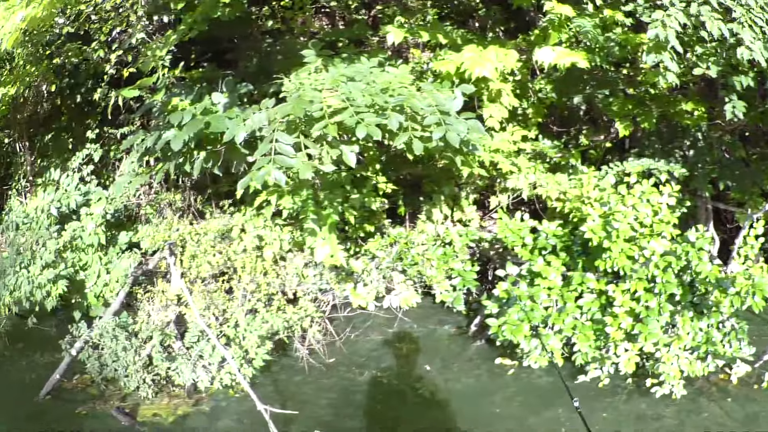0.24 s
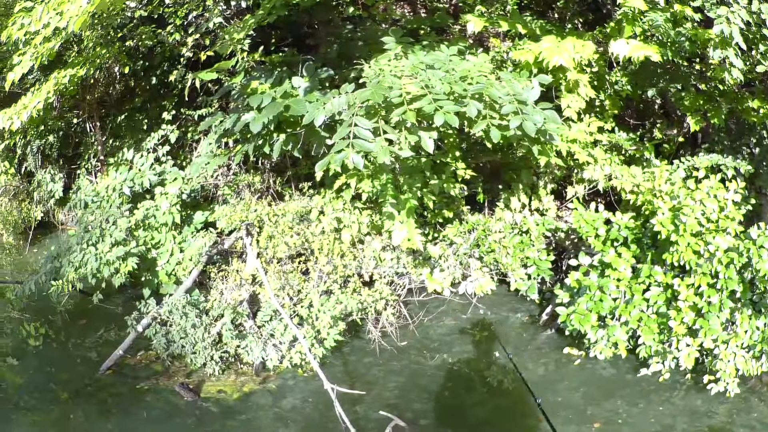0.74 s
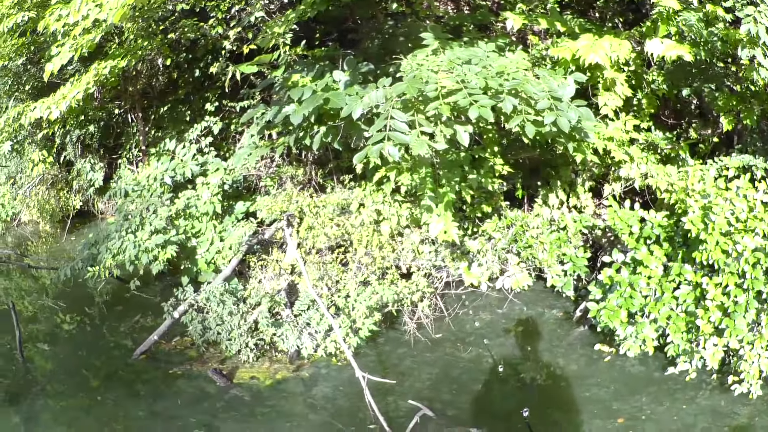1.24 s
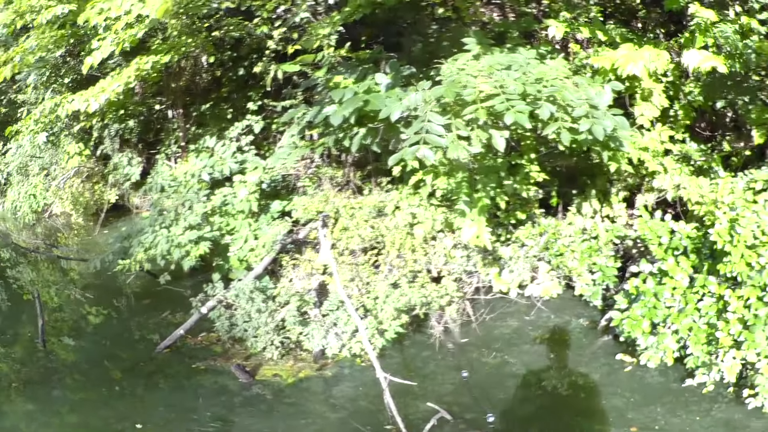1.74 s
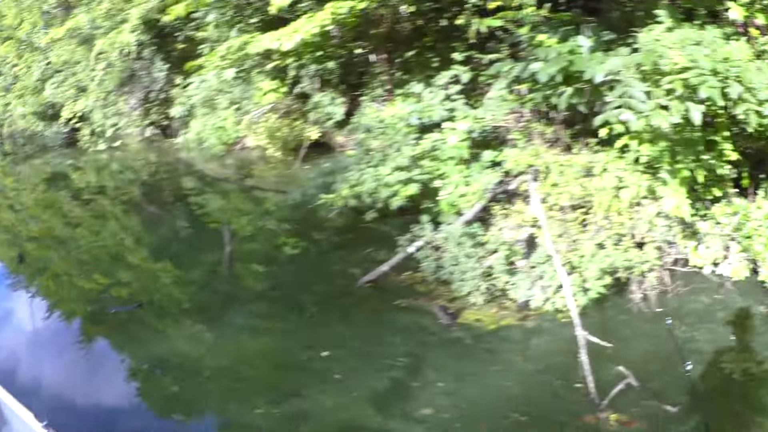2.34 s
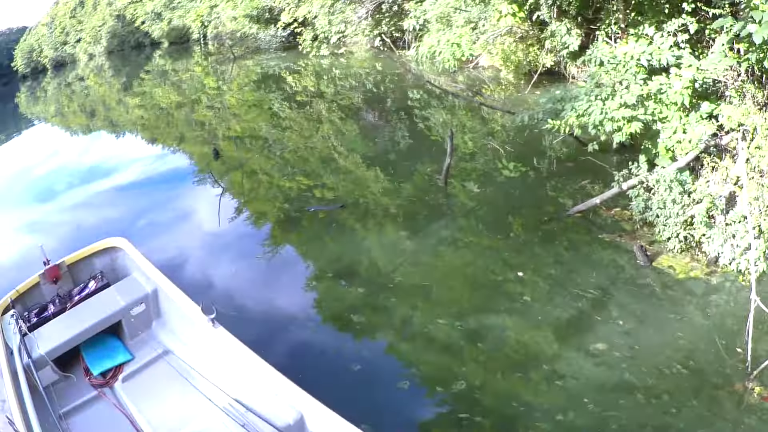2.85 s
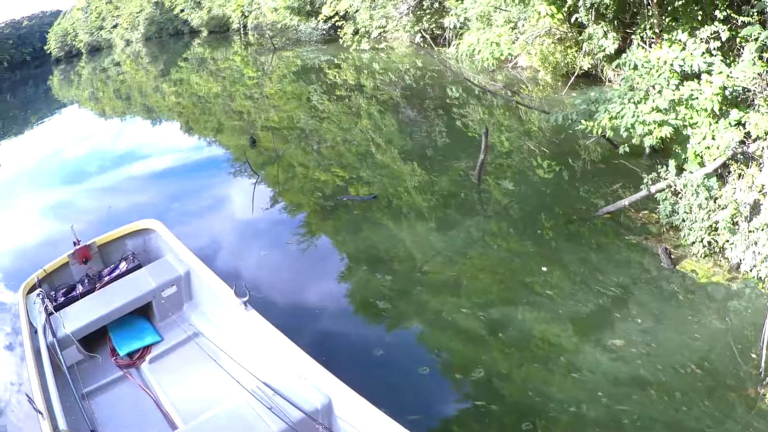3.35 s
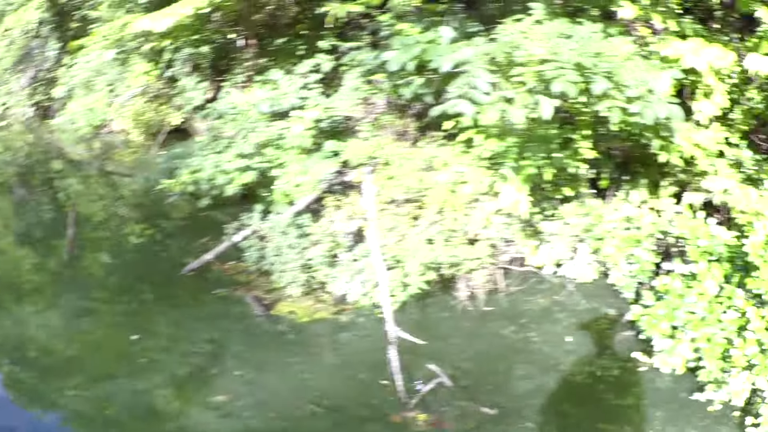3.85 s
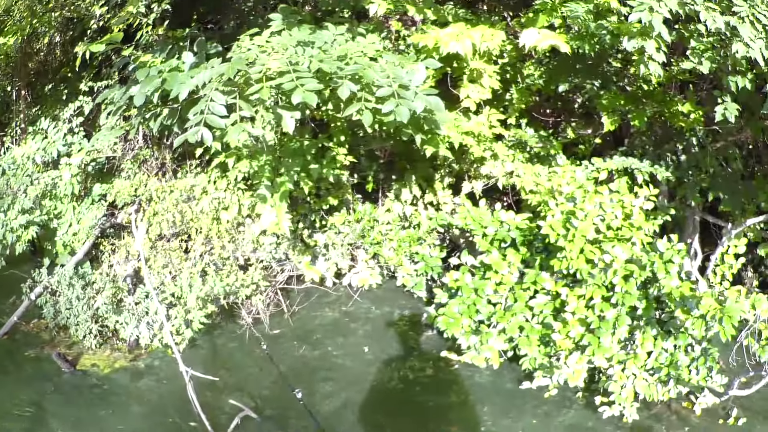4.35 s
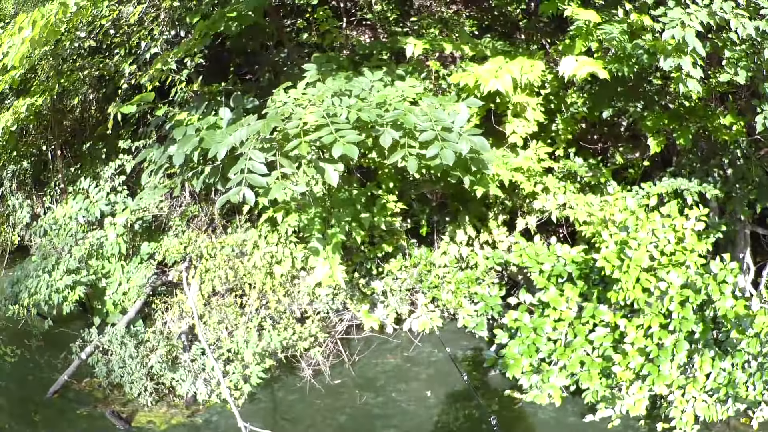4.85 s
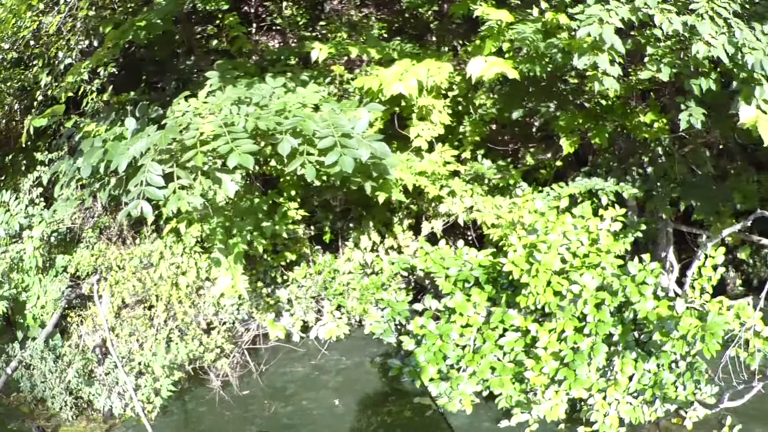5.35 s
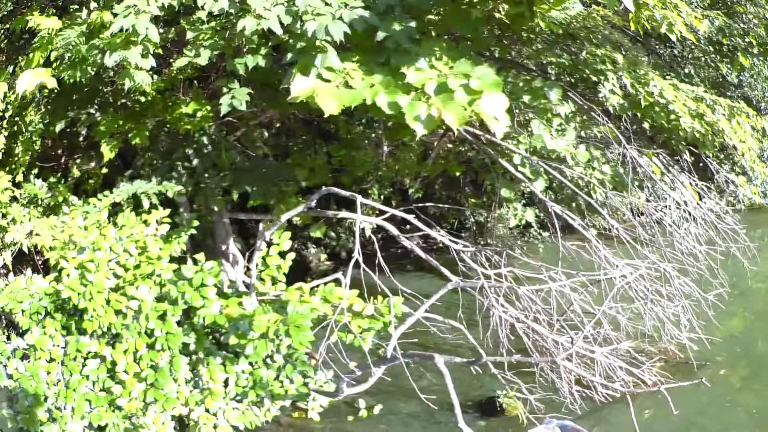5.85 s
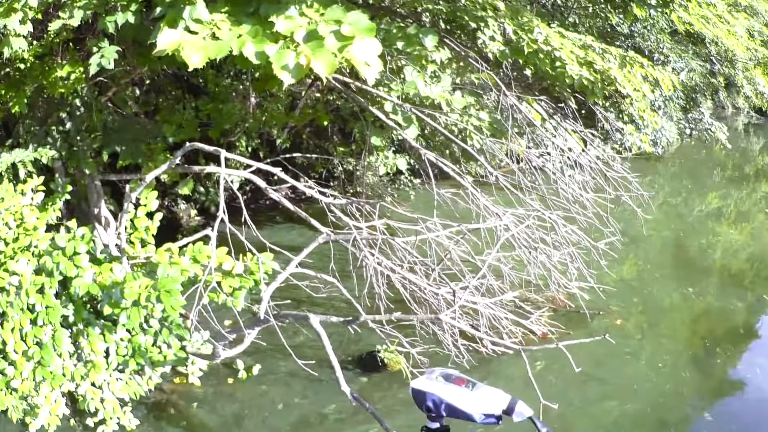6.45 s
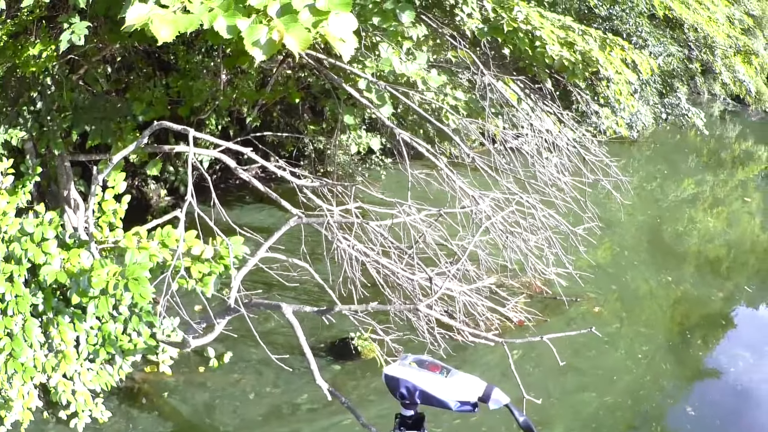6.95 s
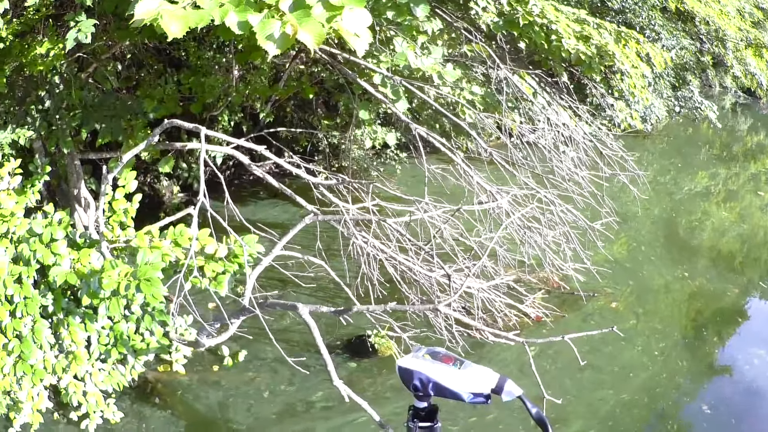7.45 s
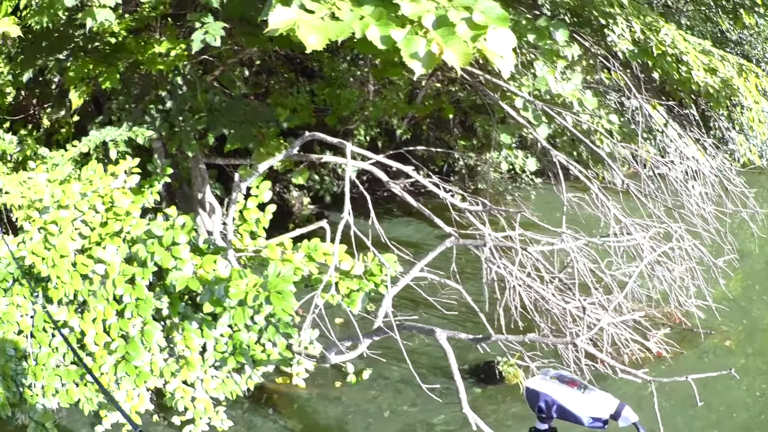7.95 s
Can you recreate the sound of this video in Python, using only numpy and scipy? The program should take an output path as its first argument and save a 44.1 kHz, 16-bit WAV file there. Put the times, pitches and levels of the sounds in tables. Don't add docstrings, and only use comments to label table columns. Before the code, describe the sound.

Shrill cicadas drone continuously from lakeside trees, one near and clear above a hazy chorus, with a lower singer swelling midway. Close by, gear clatters on a thin metal hull, a reel ratchets and slows, then hard bumps hit the microphone housing, followed by rustling line, small ticks and one sharper tick near the end. Low outdoor rumble, light hiss, nearly mono, muffled handheld microphone.

```python
import sys
import numpy as np
from scipy import signal
from scipy.fft import rfft, irfft
from scipy.io import wavfile

SR = 44100
rng = np.random.default_rng(int(sys.argv[2]) if len(sys.argv) > 2 else 0)


def inscribe(sig):
    pcm = np.round(np.clip(np.atleast_2d(sig).T, -1, 1) * 32767)
    wavfile.write(sys.argv[1], SR, pcm.astype(np.int16))


def invert_db(x):
    u = np.asarray(x, float) / 20
    return 10 ** u


N = 362061


def rms_one(x):
    return x / np.sqrt(np.mean(x ** 2) + 1e-20)


def in_time(rows):
    s, *columns = np.transpose(rows)
    return [np.interp(np.arange(N) / SR, s, column) for column in columns]


def at_hz(points, hz):
    point_hz, point_db = np.array(points).T
    return np.interp(np.log(hz + 1), np.log(point_hz), point_db, left=-140, right=-140)


def colour(x, points):
    bins_hz = np.arange(N // 2 + 1) * SR / N
    return rms_one(irfft(rfft(x) * invert_db(at_hz(points, bins_hz)), N))


def drift(rate_hz):
    r = np.exp(-80 * np.pi * rate_hz / SR)
    slow = signal.lfilter([1], [1, -2 * r, r * r], rng.standard_normal(N // 40 + 2002))[2000:]
    return np.interp(np.arange(N) / 40, np.arange(len(slow)), rms_one(slow))


def ring(clicks, hz, t60):
    r, w = invert_db(-60 / (t60 * SR)), 2 * np.pi * hz / SR
    return signal.lfilter([0, np.sin(w)], [1, -2 * r * np.cos(w), r * r], clicks + 1e-18)


def narrow(x, hz, width_hz):
    t60 = np.log(1000) / (np.pi * width_hz)
    return rms_one(ring(ring(x, hz, t60), hz, t60))


def butter(x, order, hz, kind="low"):
    return signal.sosfilt(signal.butter(order, hz, kind, fs=SR, output="sos"), x)


def muffle(x):
    return butter(x, 4, 2200)


def port_notch(x):
    return signal.sosfilt(signal.cheby2(8, 45, 4500, fs=SR, output="sos"), x)


def above_notch(x):
    return signal.sosfilt(signal.cheby2(8, 40, 5400, "high", fs=SR, output="sos"), x)


# frequency in Hz, level in dB per Hz.
AIR_SPECTRUM = [(12, -46), (20, -7.5), (60, -2), (91, -4), (118, 0.5), (188, -2.5), (243, -3), (416, -5.5),
                (538, -6.5), (729, -8.5), (1030, -8.5), (2450, -18), (3170, -26.5), (4500, -50.5),
                (5300, -41), (6890, -67), (11700, -120)]


def open_air():
    return invert_db(-52.5 + 0.94 * drift(2.2)) * colour(rng.standard_normal(N), AIR_SPECTRUM)


# frequency in Hz, level in dB per Hz.
HISS_SPECTRUM = [(5880, -33), (10000, -1.5), (10700, -18), (12400, -13), (15100, -2.5), (15800, -4.5)]


def microphone_hiss():
    return invert_db(-64 + 2.0 * drift(230)) * colour(rng.standard_normal(N), HISS_SPECTRUM)


# frequency in Hz, level in dB per Hz.
PORT_SPECTRUM = [(12, -37), (20, -2.5), (116, -3), (1600, -12), (2240, -15.5), (2720, -20.5), (3040, -28),
                 (3310, -47), (10700, -48), (11600, -28), (13000, -41), (14100, -13.5), (15800, -13.5)]


def port_difference():
    apart = invert_db(-71) * colour(rng.standard_normal(N), PORT_SPECTRUM)
    return apart * np.array([[1], [-1]])


# centre in seconds, level in dB, pitch in Hz.
CHIPS = [
    (.61, -63.5, 3150),
    (2.40, -61.5, 3130),
    (5.285, -62, 3200),
    (6.86, -59, 3220),
]


def bird():
    t, out = np.arange(N) / SR, 0
    for s, db, hz in CHIPS:
        onset = np.exp(-((t - s + 0.04) / 0.031) ** 2)
        body = np.exp(-((t - s) / np.where(t < s, 0.022, 0.045)) ** 2)
        noise = rng.standard_normal(N)
        chip = body * narrow(noise, hz, 590) + 0.32 * onset * narrow(noise, hz * 1.17, 600)
        out = out + invert_db(db) * chip
    return out


# hardest moment in seconds, body in dB, scrape in dB, rise in seconds, fall in seconds.
DRAGS = [(3.79, -54, -67, .12, 0.046), (3.856, -46, -70, .05, .06), (4.256, -46.5, -54.5, .012, 0.21),
         (4.41, -49.5, -55, 0.087, 0.63), (5.3, -66, -58, .1, .2), (5.404, -50, -51.5, 0.054, .06),
         (5.56, -49, -50, 0.11, .12), (5.716, -44, -47, 0.26, 0.26), (6.106, -40.5, -47.5, 0.094, 0.17),
         (6.29, -47, -51, 0.12, 0.53), (7.7, -62, -61, .01, 0.18), (8.04, -64, -51, .01, 0.17)]


def rustle():
    grains = rng.standard_normal(N) * (rng.random(N) < 4000 * invert_db(5 * drift(40)) / SR)
    body = narrow(grains, 930, 380)
    scrape = narrow(grains, 2560, 570) + 0.43 * narrow(grains, 3600, 1100)
    scrape = rms_one(scrape + 1.47 * narrow(grains, 1670, 530))
    out, t = 0, np.arange(N) / SR
    for s, body_db, scrape_db, rise_s, fall_s in DRAGS:
        drag = invert_db(-20 * np.maximum((s - t) / rise_s, (t - s) / fall_s))
        out = out + drag * (invert_db(body_db - 7.5) * body + invert_db(scrape_db - 5.5) * scrape)
    return out


def small_parts(events, boost_db, scatter_s, t60):
    out, fade = np.zeros(N + SR), np.exp(-np.arange(4000) / (scatter_s * SR))
    for s, db, hz in events:
        click = np.eye(1, 4000)[0] + 0.085 * fade * rng.standard_normal(4000)
        tick = ring(click, hz, t60)
        tick += 0.37 * ring(click, hz * 0.76, t60 * 0.5) + 0.28 * ring(click, hz * 1.39, t60 * 0.5)
        out[round(s * SR):][:4000] += invert_db(db + boost_db) * butter(tick, 2, hz * 0.65, "high")
    return out[:N]


# start in seconds, peak in dB, pitch in Hz.
CRACKLES = [(4.2566, -52.5, 2690), (5.554, -52, 2640), (5.684, -44, 3530), (5.717, -49, 3100),
            (5.768, -51, 2800), (6.078, -46, 2690), (6.2924, -54, 3130), (6.3, -42.5, 2900),
            (6.4133, -41.5, 2640), (6.4837, -50, 3090), (6.5096, -47, 2900), (7.6934, -56, 2760),
            (7.7792, -48.5, 2600), (8.0376, -57, 2640)]


def crackles():
    return small_parts(CRACKLES, boost_db=2.5, scatter_s=0.012, t60=0.0059)


# start in seconds, peak in dB, pitch in Hz.
TICKS = [(0.31, -47.5, 1380), (0.452, -45, 1360), (0.64, -43.5, 1240), (3.729, -41, 1220),
         (3.755, -39, 1220), (3.779, -43, 934), (3.795, -41, 1220), (3.855, -43, 1360), (3.864, -43, 1060),
         (5.402, -48, 899), (5.574, -45, 885), (5.854, -35, 1310), (6.038, -45, 802), (6.071, -39, 1850),
         (6.109, -39.5, 950), (6.292, -48, 940), (6.417, -39.5, 1000), (6.443, -44, 930),
         (6.484, -42.5, 980), (7.635, -30, 1170), (7.693, -45.5, 1250), (7.779, -49, 802),
         (7.883, -48, 900), (8.097, -44, 1100)]


def tackle_ticks():
    return small_parts(TICKS, boost_db=2.5, scatter_s=0.0063, t60=0.017)


def rattle():
    start_s, gap_s, level_db, pitch_hz = 3.764, 0.0099, -41, 1240
    touches = []
    for k in range(5):
        hz = pitch_hz * (1 + 0.14 * (-1) ** k * rng.random())
        touches.append((start_s + gap_s * k, level_db, hz))
    return muffle(small_parts(touches, boost_db=-2, scatter_s=0.01, t60=0.021))


# start in seconds, peak in dB.
RATCHET = [(2.619, -47), (2.698, -44), (2.765, -42.5), (2.807, -45), (2.855, -45), (2.898, -43.5),
           (2.944, -42), (2.99, -43.5), (3.046, -41), (3.111, -40), (3.182, -41), (3.256, -42),
           (3.363, -41)]
# frequency in Hz, level in dB, t60 in seconds.
REEL_MODES = [(410, 1.5, 0.062), (456, -5, 0.05), (550, -2, 0.034), (730, 2, 0.027), (950, -7, 0.014),
              (1430, 4.5, 0.011), (1890, -0.5, .01), (2600, -7, 0.0069)]


def reel():
    out, fade = np.zeros(N), np.exp(-np.arange(2000) / (0.019 * SR))
    for hz, mode_db, t60 in REEL_MODES:
        force = np.zeros(N + 2000)
        for s, level_db in RATCHET:
            contact = fade * rng.standard_normal(2000)
            contact[0] += 14
            contact /= np.linalg.norm(contact)
            strength_db = level_db + mode_db + 0.8 * rng.standard_normal()
            force[round(s * SR):][:2000] += invert_db(strength_db) * contact
        out += ring(force[:N], hz, t60)
    return invert_db(-2.0) * out


def one_knock(modes, level_db):
    t = np.arange(SR // 3) / SR
    chatter = np.exp(-t / 0.0019) + 0.48 * np.exp(-t / 0.02)
    contact = chatter * rng.standard_normal((len(modes), len(t)))
    contact /= np.linalg.norm(contact, axis=1, keepdims=True)
    blow = sum(invert_db(level_db + db) * ring(c, hz, t60) for c, (hz, db, t60) in zip(contact, modes))
    return butter(blow, 4, 150, "high")


# start in seconds, peak in dB, brightness in dB per octave.
KNOCKS = [(1.504, -13.5, -1), (1.533, -15, 0.5), (1.568, -31, -13), (1.604, -41, -17.5), (1.706, -17.5, -2),
          (1.739, -23, -2.5), (1.844, -29.5, -3), (1.934, -34.5, -5), (1.99, -51.5, 12.5),
          (2.045, -29, -4.5), (2.06, -27.5, -4), (2.12, -35, -10.5), (2.171, -36.5, 2.5), (2.3, -38, 0)]
# frequency in Hz, level in dB, t60 in seconds.
HULL_MODES = [(177, -8.5, 0.074), (247, -5.5, 0.11), (293.3, -5, 0.2), (371, -2.5, 0.11),
              (449.5, -5.5, 0.19), (543, -9, 0.063), (602, -7, 0.12), (704, -5.5, 0.049),
              (797, -4.5, 0.077), (940, -15, 0.063), (1100, -6.5, 0.044), (1220, -13, 0.08),
              (1300, -11, 0.057), (1554, -17, 0.044), (1750, -7.5, 0.019), (1940, -21, .03),
              (2160, -23, 0.033)]


def hull():
    out = 0
    for s, db, bright_db in KNOCKS:
        modes = [(hz, level + bright_db * np.log2(hz / 400), t60) for hz, level, t60 in HULL_MODES]
        out = out + np.pad(one_knock(modes, db - 8), (round(s * SR), N))[:N]
    return out


# start in seconds, peak in dB, contact sharpness in Hz, shake in dB, sway in dB.
BUMPS = [
    (3.66, -4, 1060, -19.5, -35),
    (3.750, -31, 292, -35, -28.5),
    (3.858, -38, 400, -33, -30),
    (3.886, -33, 200, -51, -39),
    (5.468, -13, 910, -24, -22),
    (5.546, -37, 250, -35.5, -29.5),
    (5.853, -39, 500, -35.5, -32),
    (5.867, -28, 302, -46, -40),
    (1.899, -35, 150, -41, -47),
    (2.3, -37, 149, -56, -40),
]
# frequency in Hz, level in dB, t60 in seconds.
HOUSING_MODES = [(70, -20.5, 0.17), (138, -12, 0.1), (267, -12, 0.1), (685, -13, 0.032),
                 (1160, -9.5, 0.025), (1380, -19, 0.042)]


def bumps():
    out, t = np.zeros(N + SR), np.arange(-200, SR // 4) / SR
    after = np.maximum(t, 0)
    sway = -np.sin(2 * np.pi * 62 * after ** 0.78 * 0.5) * np.exp(-after / 0.0054)
    for s, db, sharp_hz, shake_db, sway_db in BUMPS:
        u = t * sharp_hz
        push = np.exp(-(u * 3.86) ** 2)
        dips = 0.24 * np.exp(-((u + 0.5) * 4.8) ** 2) + 0.24 * np.exp(-((u - 2.4) * 1.8) ** 2)
        dips += 0.14 * np.exp(-((u - 1.2) * 3.4) ** 2)
        noise = rng.standard_normal(len(t)) * np.clip(t / 0.004, 0, 1) * np.exp(-after / 0.013)
        shake = sum(invert_db(level) * ring(noise, hz, t60 / 2.0) for hz, level, t60 in HOUSING_MODES)
        shake /= np.abs(shake).max()
        bump = invert_db(db) * (push - dips) + invert_db(shake_db) * shake + invert_db(sway_db + 2.0) * sway
        out[round(s * SR) - 200:][:len(t)] += bump
    return butter(out[:N], 2, 40, "high")


def between_notches(chorus_db):
    t, noise = np.arange(N) / SR, rng.standard_normal((2, N))
    peep = invert_db(-84) * np.exp(-((t - 0.41) / 0.06) ** 2) * narrow(noise[1], 5200, 300)
    return invert_db(chorus_db - 48.5) * narrow(noise[0], 4950, 350) + peep


# frequency in Hz, level in dB per Hz.
TYMBAL_SPECTRUM = [(3380, -72), (5750, -40), (6060, -16), (6110, -14), (6400, -18.5), (6530, -16),
                   (7060, -3), (7710, -5.5), (8360, 0), (9310, -7.5), (9550, -14), (10300, -22.5),
                   (11500, -23), (15000, -67), (22000, -120)]


def chorus(level_db):
    clicks = rng.standard_normal(N) * invert_db(2.5 * drift(300) + 0.6 * drift(25))
    song, sway = colour(clicks, TYMBAL_SPECTRUM), invert_db(1.2 * drift(2.5))
    lower = signal.sosfiltfilt(signal.butter(4, 7750, fs=SR, output="sos"), song)
    return invert_db(level_db - 4.5) * (lower * np.roll(sway, N // 2) + (song - lower) * sway)


# time in seconds, level in dB.
LOW_SONG = [
    (0, -80),
    (.6, -59.5),
    (1.7, -51.5),
    (2.2, -54.5),
    (3.3, -46),
    (4.5, -60.5),
    (4.92, -55.5),
    (5.05, -79),
    (8.21, -68),
]


def low_cicada(level_db):
    t = np.arange(N) / SR
    throb = 1 + 0.5 * np.sin(2 * np.pi * 92 * t + 1.5 * drift(12))
    spread = butter(rng.standard_normal((2, N)), 2, 330)
    pitch_hz = np.clip(7210 - 300 * (t - 1.2), 6600, 7210)
    turn = 2 * np.pi * np.cumsum(pitch_hz) / SR
    song = rms_one(throb * (spread[0] * np.sin(turn) + spread[1] * np.cos(turn)))
    whine_hz = 6255 - 210 * (t - 4.4) ** 2
    attack, release = (t - 3.2) / 0.35, (4.97 - t) / 0.07
    swell = np.clip(np.minimum(attack, release), 0, 1) ** 2
    whine = invert_db(-58) * swell * drift(45) * np.sin(2 * np.pi * np.cumsum(whine_hz) / SR)
    return invert_db(level_db - 3.0) * song + whine


# time in seconds, frequency in Hz.
NEAR_LINE = [(.2, 8444), (.8, 8464), (1.4, 8492), (2.15, 8520), (2.9, 8474), (3.4, 8463), (3.8, 8478),
             (4.4, 8478), (4.7, 8458), (5.7, 8460), (6.3, 8480), (6.9, 8502), (8, 8492)]
# sideband in throb rates, level in dB.
THROB_LINES = [(-0.83, -3), (0, -0.5), (0.79, -1), (2, -1)]


def near_cicada(level_db):
    ref_hz, rib_hz, throb_hz, sac_hz = 8462, 451.3, 96.5, 8150
    pace = in_time(NEAR_LINE)[0] / ref_hz * (1 + 0.000894 * drift(11.2))
    turn, out = 2 * np.pi * np.cumsum(pace) / SR, 0
    for rib in range(-4, 3):
        for throb, throb_db in THROB_LINES:
            hz = ref_hz + rib * rib_hz + throb * throb_hz
            sac_db = -4 * ((hz - sac_hz) / 1000) ** 2
            line_db = at_hz(TYMBAL_SPECTRUM, hz) + throb_db + sac_db + 3.2 * drift(2.8)
            out = out + invert_db(line_db) * np.sin(hz * turn + 0.9 * drift(4))
    return invert_db(level_db) * rms_one(out)


# time in seconds, near singer in dB, chorus in dB.
SONG = [(0, -52.5, -50), (1.2, -51.5, -49.5), (1.7, -47.5, -46), (2.1, -57, -45), (2.5, -46.5, -43),
        (3.1, -44.5, -44.5), (3.8, -47, -44.5), (4.1, -48.5, -47), (4.7, -51.5, -50), (5.1, -51, -50),
        (5.6, -53, -51), (7, -52.5, -52), (8.21, -53, -55.5)]


def scene():
    near_db, chorus_db = in_time(SONG)
    trees = above_notch(near_cicada(near_db) + chorus(chorus_db) + low_cicada(*in_time(LOW_SONG)))
    early_bumps = np.roll(bumps(), -15)
    blows = muffle(hull() + reel() + tackle_ticks() + early_bumps)
    close = port_notch(blows + crackles() + rustle() + bird())
    background = open_air() + microphone_hiss() + port_difference()
    return trees + between_notches(chorus_db) + rattle() + close + background


def top_cut(x):
    return signal.sosfilt(signal.butter(12, 16310, fs=SR, output="sos"), x)


def record(dry):
    return top_cut(dry)


dry = scene()
out = record(dry)
inscribe(out)
```